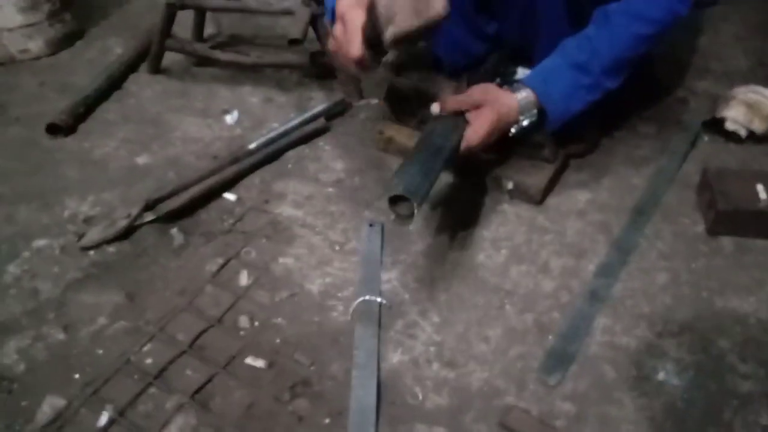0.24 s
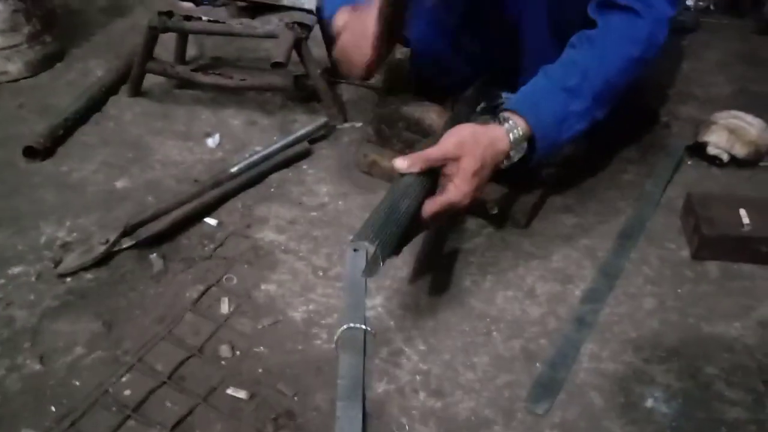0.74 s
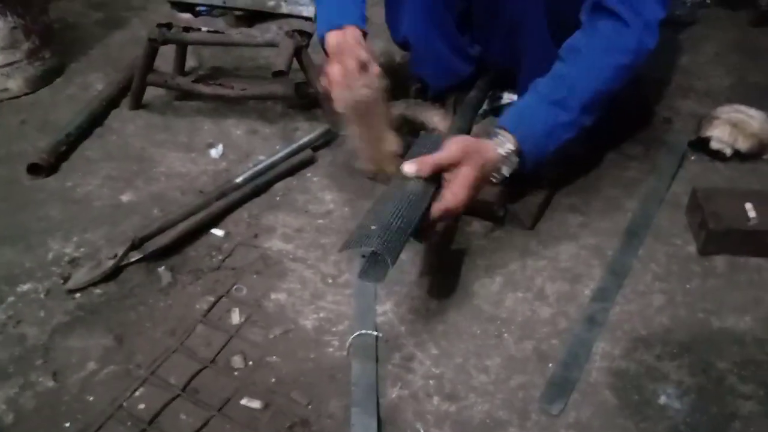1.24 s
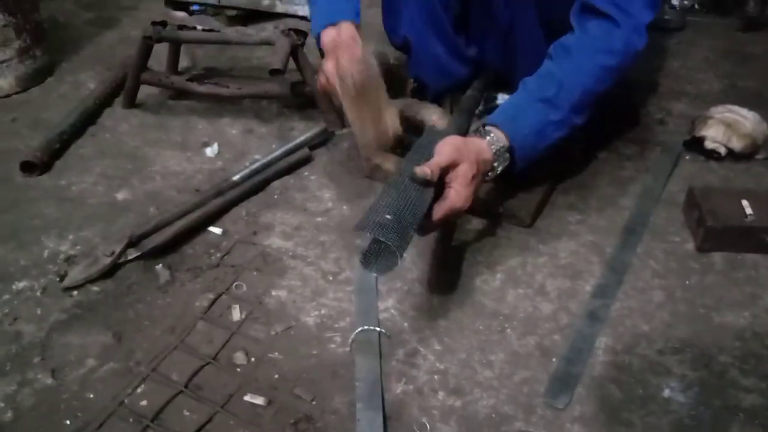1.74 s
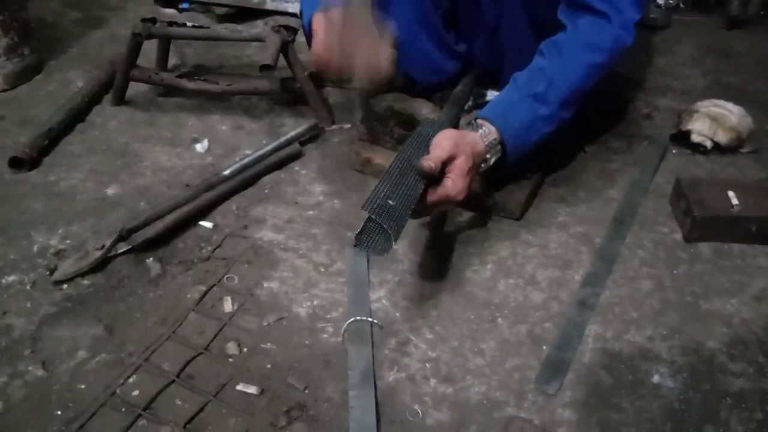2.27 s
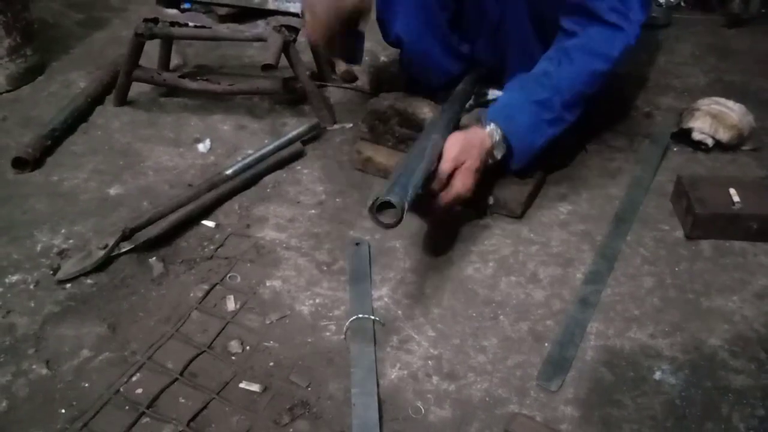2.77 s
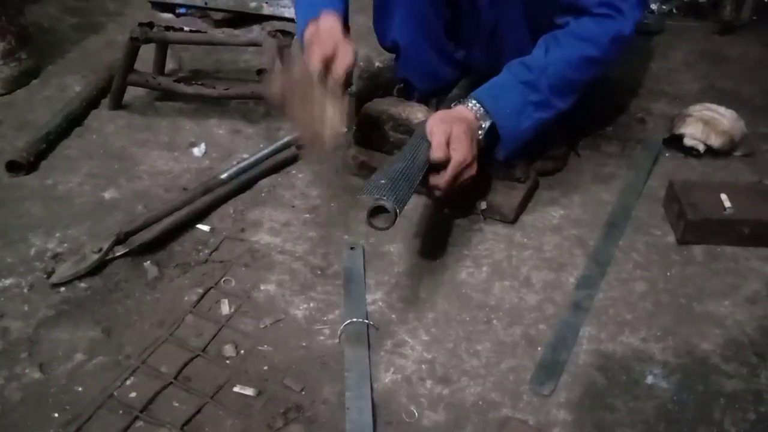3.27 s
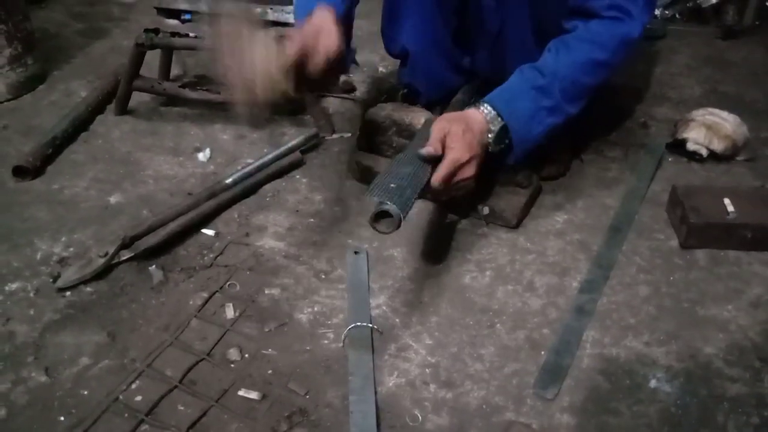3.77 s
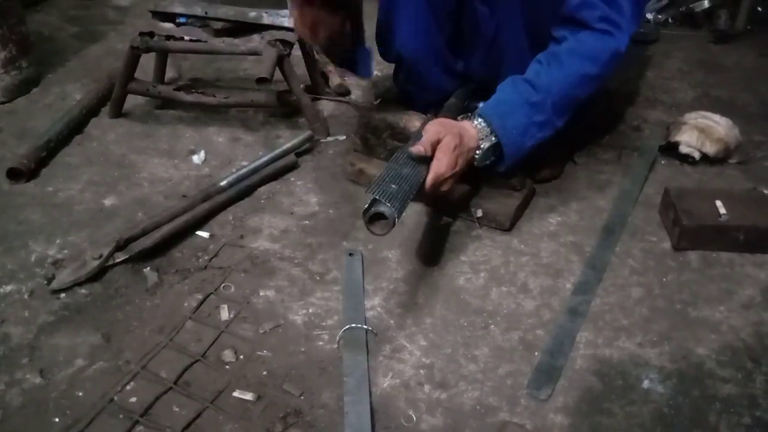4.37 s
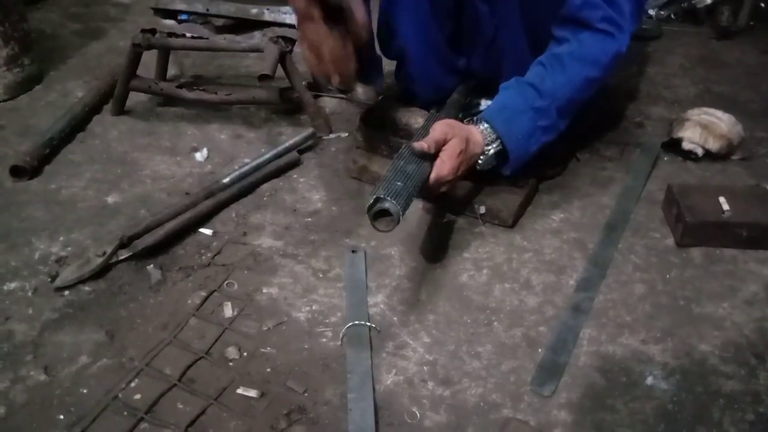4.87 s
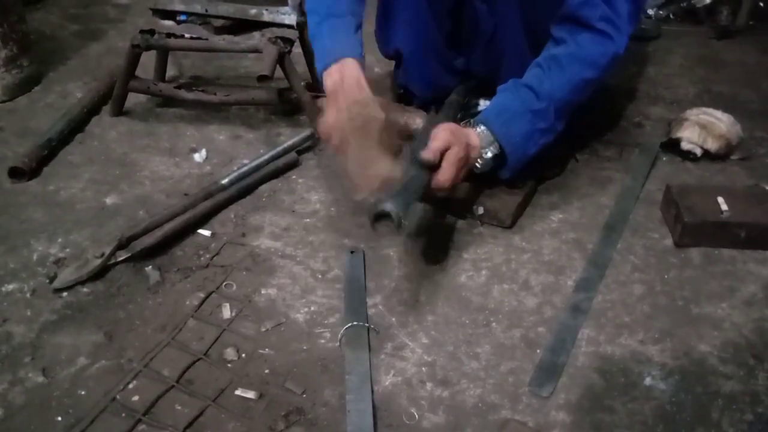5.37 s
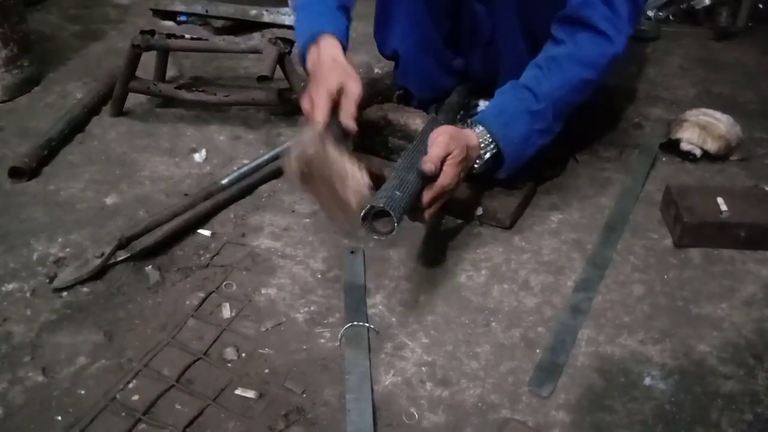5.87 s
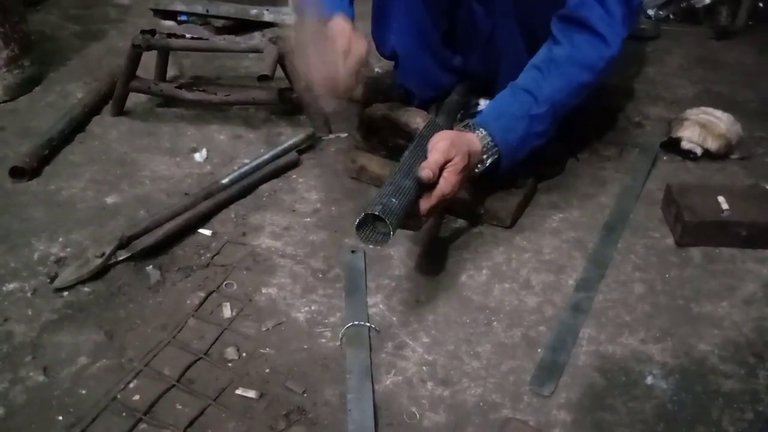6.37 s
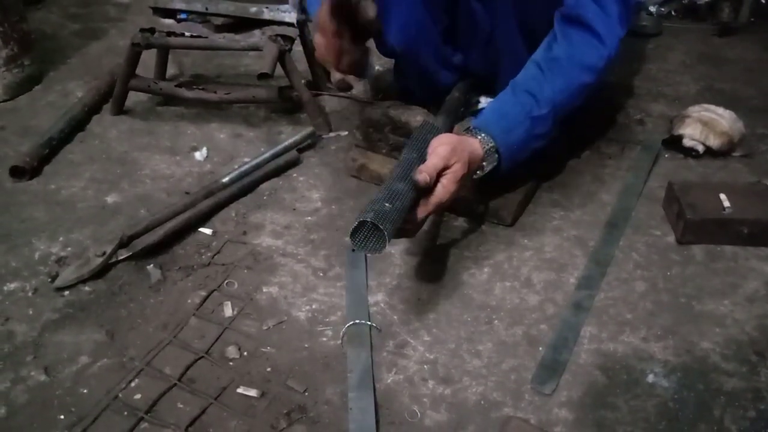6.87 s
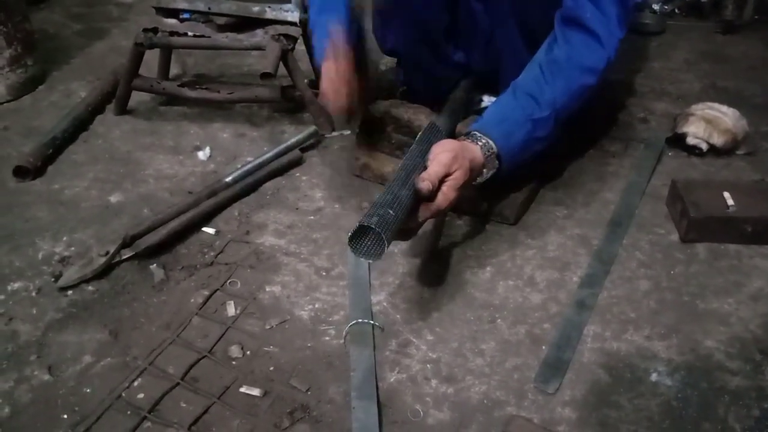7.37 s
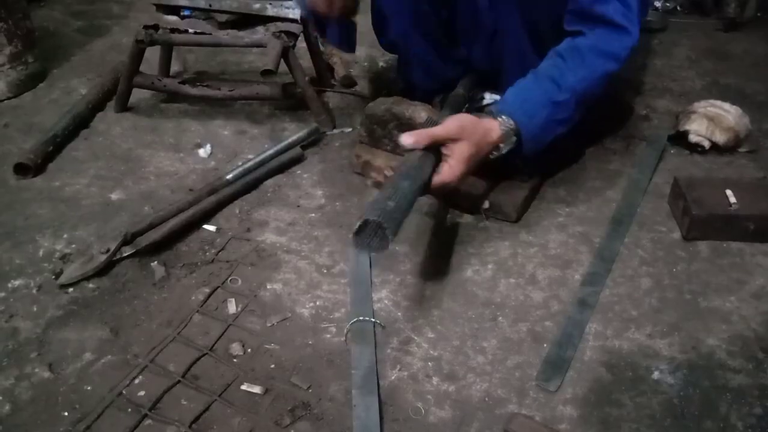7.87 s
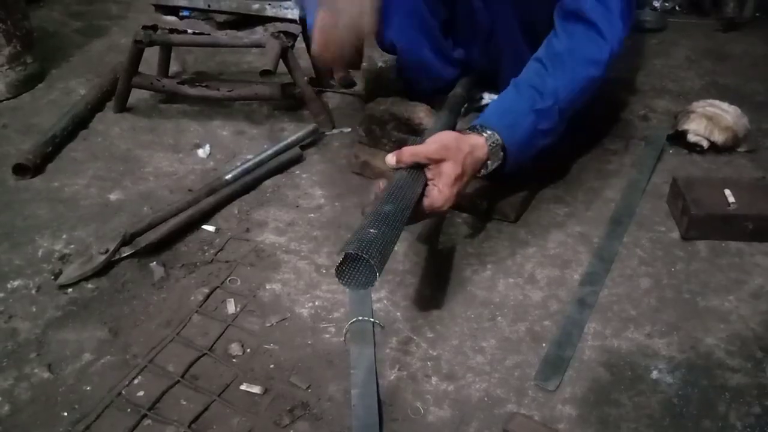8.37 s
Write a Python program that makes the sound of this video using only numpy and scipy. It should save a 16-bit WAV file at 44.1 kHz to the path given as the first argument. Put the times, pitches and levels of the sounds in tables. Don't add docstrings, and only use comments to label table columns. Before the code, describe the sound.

Regular mallet blows on a thin steel tube, crack, thud and brief damped ring, with distant tool clanks and machine drone in a shed.

```python
import sys
import numpy as np
from scipy import signal
from scipy.fft import rfft, irfft
from scipy.io import wavfile
from scipy.ndimage import uniform_filter1d

SR = 44100
rng = np.random.default_rng(int(sys.argv[2]) if len(sys.argv) > 2 else 0)


def volts_from_decibels(level):
    exponent = np.asarray(level, float) / 20
    return 10 ** exponent


def to_wav(sig):
    pcm = np.clip(np.atleast_2d(sig), -1, 1) * 32767
    pcm = np.round(pcm).astype(np.int16)
    wavfile.write(sys.argv[1], SR, pcm.T)


N = 380583


def unit(x):
    return x / np.sqrt(np.mean(x ** 2) + 1e-20)


def at_hz(points, hz):
    table_hz, value = np.transpose(points)
    return np.interp(np.log(hz), np.log(table_hz), value)


def coloured(x, spectrum):
    hz = np.maximum(np.fft.rfftfreq(N, 1 / SR), 1)
    return unit(irfft(rfft(x) * volts_from_decibels(at_hz(spectrum, hz)), N))


def drift(rate_hz):
    r = np.exp(-80 * np.pi * rate_hz / SR)
    slow = signal.lfilter([1], [1, -2 * r, r * r], rng.standard_normal(N // 40 + 2002))
    slow = slow[2000:]
    return np.interp(np.arange(N) / 40, np.arange(len(slow)), unit(slow))


def ring(clicks, hz, t60_s):
    r = volts_from_decibels(-60 / (t60_s * SR))
    w = 2 * np.pi * hz / SR
    return signal.lfilter([0, np.sin(w)], [1, -2 * r * np.cos(w), r * r], clicks + 1e-18)


def clicks_at(times_s, sizes):
    out = np.zeros(N)
    out[np.round(np.asarray(times_s) * SR).astype(int)] = sizes
    return out


# f/Hz, share
PORT_LIKENESS = [(60, 0.97), (250, 0.93), (700, 0.44), (1500, 0.25), (4000, 0.0069), (12000, 0.0063)]


def likeness(hz):
    return np.clip(at_hz(PORT_LIKENESS, hz), 0, 1)


def port_pair(mid, side, alike):
    return np.sqrt(1 + alike) * mid + np.sqrt(1 - alike) * side * [[1], [-1]]


# f/Hz, level/dB
PORT_LEAN = [(60, -2.5), (150, -2), (380, -2), (950, 0.5), (2380, -1), (5980, -2.5), (15000, -3.5)]
EDGES_HZ = np.geomspace(35, 16800, 28)


def bands(length):
    white = rng.standard_normal((2, 2, length))
    for k, (low, high) in enumerate(zip(EDGES_HZ, EDGES_HZ[1:])):
        band = signal.butter(2, [low, high], "band", fs=SR, output="sos")
        mid, side = signal.sosfilt(band, white[k % 2])
        hz = np.sqrt(low * high)
        lean_db = at_hz(PORT_LEAN, hz) / 2
        yield hz, port_pair(mid, side, likeness(hz)) * volts_from_decibels([[lean_db], [-lean_db]])


def struck(times_s, strength_db, modes, spread_db):
    port_lag_s, port_spread_db = .00006, 2.0
    luck = rng.standard_normal((len(times_s), len(modes), 3))
    sign = rng.choice([-1, 1], luck.shape[:2])
    out = np.zeros((2, N))
    for k, (hz, db, t60_s) in enumerate(modes):
        size_db = strength_db + db + spread_db * luck[:, k, 0]
        uneven = 1 - likeness(hz)
        for side, way in enumerate((1, -1)):
            at_s = np.maximum(times_s + way * uneven * port_lag_s * luck[:, k, 1], 0)
            port_db = size_db + way * uneven * port_spread_db * luck[:, k, 2]
            out[side] += ring(clicks_at(at_s, sign[:, k] * volts_from_decibels(port_db)), hz, t60_s)
    return out


def burst(times_s, level_db, spectrum, t60_s, rise_s, grain_db):
    shape = np.zeros(N)
    for s, db in zip(times_s, level_db):
        start = round(s * SR)
        t = np.arange(min(N - start, SR // 2)) / SR
        shape[start:start + len(t)] += volts_from_decibels(db - 60 * t / t60_s) * (1 - np.exp(-t / rise_s))
    alike = likeness(np.maximum(np.fft.rfftfreq(N, 1 / SR), 1))
    mid, side = rfft(rng.standard_normal((2, N)))
    pair = irfft(port_pair(mid, side, alike), N)
    return shape * coloured(pair, spectrum) * unit(volts_from_decibels(grain_db * drift(147)))


# t/s, level/dB
ACTIVITY = [(0.0, -33.5), (0.55, -37.5), (0.69, -35), (0.96, -39), (1.18, -41.5), (2.06, -41), (3.03, -39),
            (3.15, -40), (3.53, -45), (3.92, -44.5), (4.2, -42.5), (4.47, -43.5), (4.62, -43), (5.26, -40),
            (6.3, -42), (7.07, -42.5), (8.41, -46.5), (8.63, -52.5)]
# t/s, level/dB
ENGINE_LEVEL = [(0.0, -57), (1.95, -62.5), (3.05, -54.5), (3.22, -60), (3.75, -62.5), (7.24, -60),
                (7.79, -65), (8.63, -69)]
# f/Hz, level/dB per Hz
AIR_SPECTRUM = [(18, -47), (30, -26), (86, -3), (190, -11.5), (371, -3.5), (498, -7.5), (682, -1.5),
                (1080, -6.5), (1510, -7.5), (1990, 1), (2660, -3.5), (3500, -9), (4500, -11), (5850, -47),
                (9900, -120)]
# f/Hz, level/dB per Hz
HISS_SPECTRUM = [(2120, -69), (3600, -5), (4420, -6), (5010, -0.5), (5370, 1.5), (7060, -14), (7660, -19),
                 (9010, -14.5), (9530, -25.5), (9770, -24), (11200, -18), (12400, -19), (13400, -16.5),
                 (15000, -9), (16000, -7.5)]


def roar():
    drone_hz = 85.3
    body_db, body_follows = -39, .8
    hiss_db, hiss_follows = -41, 0.94
    t = np.arange(N) / SR
    activity_db = np.interp(t, *np.transpose(ACTIVITY))
    rumble_db = np.interp(t, *np.transpose(ENGINE_LEVEL)) + 5.5
    swing_db = activity_db - activity_db.mean()
    parts = [0, 0, 0]
    together = drift(2.6)
    for hz, noise in bands(N):
        part = int(hz > 200) + int(hz > 3800)
        parts[part] = parts[part] + noise * volts_from_decibels(1.46 * together + 2.0 * drift(11.8))
    drone = unit(ring(rng.standard_normal(N), drone_hz, 1.0))
    rumble = coloured(parts[0], AIR_SPECTRUM) + .5 * drone
    body = coloured(parts[1], AIR_SPECTRUM)
    hiss = coloured(parts[2], HISS_SPECTRUM)
    out = volts_from_decibels(rumble_db) * rumble
    out += volts_from_decibels(body_db + body_follows * swing_db) * body
    return out + volts_from_decibels(hiss_db + hiss_follows * swing_db) * hiss


# t/s, force level/dB, thin wall level/dB, ring level/dB, spot/share of tube length
MALLET_BLOWS = [(0.228, 4.5, -19, -13, 0.34), (0.708, -1.5, -10, -5, 0.45), (1.067, 5, -16.5, -20.5, 0.021),
                (1.568, 0, -15, -8.5, 0.15), (2.006, 3.5, -11.5, -20.5, 0.058),
                (2.469, -1.5, -12, -8, .334), (3.031, 0.5, -19, -11, 0.047), (3.524, -3, -16, -3, 0.24),
                (3.996, 4.5, -27.5, -17, .03), (4.444, 2.5, -33, -15, 0.028), (4.865, -0.5, -25, -4, 0.36),
                (5.284, 4.5, -21, -18.5, 0.045), (5.703, 2, -23.5, -10.5, 0.41),
                (6.119, 2.5, -20.5, -12.5, 0.25), (6.527, 2, -22, -11, 0.34),
                (6.929, -1, -12.5, -6.5, .035), (7.321, -8, -11.5, -1.5, 0.038), (8.086, -3.5, -9, -6, .2),
                (8.517, -0.5, -12, -8, .315)]


def ducking():
    ring_db = np.transpose(MALLET_BLOWS)[3]
    return np.maximum(11 + 0.53 * ring_db, 0)


def blows():
    s, peak_db, wall_db, ring_db, spot = np.transpose(MALLET_BLOWS)
    thud_db = -38 - 0.32 * wall_db
    return s + .0025, peak_db + ducking(), wall_db, ring_db, thud_db, spot


# t/s, seam knock level/dB, left minus right level/dB
TUBE_TURN = [
    (0.2, -24, 0),
    (1.07, -16, 6),
    (2.0, -15.5, -8),
    (3.5, -29.5, -1),
    (4.45, -17, -17.5),
    (5.3, -22, 15),
    (6.4, -33, -14),
    (7.0, -21.5, 3.5),
    (8.5, -20.5, -2),
]


def turned(t):
    turn_s, knock_db, lean_db = np.transpose(TUBE_TURN)
    return np.interp(t, turn_s, knock_db), np.interp(t, turn_s, lean_db)


def grip(times_s):
    swell_s, swell_share = .005, .5
    free_s, grip_db_per_s = 0.038, 104
    t = np.arange(N) / SR
    since_s = t - times_s[np.searchsorted(times_s, t, side="right") - 1]
    swell = 1 - swell_share * np.exp(-since_s / swell_s)
    return swell * volts_from_decibels(-grip_db_per_s * np.maximum(since_s - free_s, 0))


# f/Hz, level/dB, t60/s
LOWEST_MODES = [(2140, -12, .1), (2191, -3.5, .28), (2222, -11, .15), (2290, -12, .08)]
# f/Hz, level/dB, t60/s
SECOND_MODES = [(3010, -4, 0.15), (2975, -5, 0.1), (3075, 0, 0.08)]
# f/Hz, level/dB, t60/s
THIRD_MODES = [(3850, -5, .11), (3880, -3, .17), (3925, -5, .1)]
# f/Hz, level/dB, t60/s
HIGHER_MODES = [(4947, -9, 0.14), (4890, 1.5, 0.099), (5030, 10, 0.022), (5800, 9, 0.043), (5960, 0, 0.043),
                (6900, -11, .1)]
# f/Hz, level/dB, t60/s
TOPMOST_MODES = [(10510, -21, .14), (10860, -21, .14), (11140, -23, .12), (11520, -21, .14),
                 (13550, -21, .12)]


def tube_ring():
    earlier_db = -29
    s, force_db, _, ring_db, _, spot = blows()
    duck_db = ducking()
    with_earlier_s = np.r_[0, s]

    def order_db(order):
        return duck_db + 20 * np.log10(np.abs(np.sin(order * np.pi * spot)) + 1e-3)

    low = struck(with_earlier_s, np.r_[earlier_db, force_db + ring_db - 3], LOWEST_MODES, spread_db=0.65)
    low += struck(s, duck_db - 33, HIGHER_MODES, spread_db=4.5)
    low += struck(s, force_db - 25, TOPMOST_MODES, spread_db=2.5)
    upper = struck(with_earlier_s, np.r_[earlier_db - 8, order_db(2) - 22], SECOND_MODES, spread_db=4.5)
    upper += struck(with_earlier_s, np.r_[earlier_db - 10, order_db(3) - 27], THIRD_MODES, spread_db=2.0)
    flutter_db = 2.4 * drift(70)
    tube = (low + upper * volts_from_decibels(1.2 * flutter_db)) * volts_from_decibels(flutter_db)
    lean_db = turned(np.arange(N) / SR)[1] / 2
    return tube * volts_from_decibels([lean_db, -lean_db]) * grip(with_earlier_s)


# f/Hz, level/dB, t60/s
WALL_MODES = [(1270, -25.5, 0.09), (1642, -19, 0.1), (1633, 6, 0.029), (1908, -1.5, 0.042)]
# f/Hz, level/dB, t60/s
KNOCK_MODES = [(619, 0, 0.045), (687, -8, 0.084), (731, 3.5, 0.018), (902, 10.5, 0.028)]
# f/Hz, level/dB, t60/s
BLOCK_MODES = [(89.5, -8, 0.24), (180, 0.5, 0.13), (223.6, 8, 0.049), (294.5, 0.5, 0.14),
               (370, -2.5, 0.081)]


def wall_and_block():
    s, force_db, wall_db, _, thud_db, _ = blows()
    knock_db = turned(s)[0]
    out = struck(s, force_db + wall_db, WALL_MODES, spread_db=1.5)
    out += struck(s, force_db + knock_db - 4, KNOCK_MODES, spread_db=1.5)
    return out + struck(s + 0.0015, force_db + thud_db - 2, BLOCK_MODES, spread_db=1.4)


# f/Hz, level/dB per Hz
CRACK_SPECTRUM = [(59, -43), (100, -30), (854, 0), (1360, 6), (2270, 4.5), (3120, -5.5), (3470, -8),
                  (4870, -4.5), (7400, -26), (13800, -29), (16000, -29)]
# f/Hz, level/dB per Hz
SPRAY_SPECTRUM = [(6000, -40), (9800, -25), (10600, -8), (12000, -16), (13600, 10), (16000, 10)]
# f/Hz, level/dB per Hz
SHUDDER_SPECTRUM = [(50, -8), (100, 3), (230, -7), (400, -3.5), (700, 2.5), (1200, -42)]
# f/Hz, level/dB per Hz
RATTLE_SPECTRUM = [(290, -65), (500, -40), (668, -4), (1110, -11.5), (1530, -7), (2010, -4.5), (2190, -2),
                   (2360, -7), (3060, -9.5), (3490, -24.5), (4870, -17.5), (9490, -40), (9920, -64),
                   (10500, -27.5), (16000, -49)]


def crack_and_debris():
    s, force_db, _, _, thud_db, _ = blows()
    out = burst(s - .001, force_db - 6.0, CRACK_SPECTRUM, 0.024, rise_s=0.0018, grain_db=3.0)
    out += burst(s, force_db - 33.5, SPRAY_SPECTRUM, 0.19, rise_s=0.0024, grain_db=7.0)
    out += burst(s + 0.0024, force_db + thud_db, SHUDDER_SPECTRUM, 0.18, rise_s=0.0085, grain_db=3.0)
    return out + burst(s + 0.0082, force_db - 22.0, RATTLE_SPECTRUM, 0.21, rise_s=0.0054, grain_db=1.0)


# t/s, peak level/dB, low mode f/Hz, middle mode f/Hz, ring level/dB (near 0 clank, far below rustle)
FAR_CLANKS = [(0.6025, -19.5, 2290, 3630, -4), (0.986, -21.5, 1960, 3715, -6),
              (1.8997, -20.5, 2020, 3270, -4.5), (2.25, -26, 2430, 3600, -5), (2.826, -22.5, 2000, 5900, 0),
              (2.8376, -17, 1900, 3466, -3), (3.716, -24.5, 2270, 3605, 2.5),
              (3.866, -13, 2610, 3800, -0.5), (3.878, -41, 2850, 3850, -1), (4.236, -28, 2080, 4230, 2),
              (4.408, -20.5, 2720, 4220, -9), (4.829, -19, 2250, 3773, -1), (5.097, -38, 2620, 4143, -9),
              (5.1515, -19.5, 2880, 3710, -4), (5.9756, -19.5, 2370, 3604, -4.5),
              (6.3135, -24, 2080, 3340, -5), (7.0966, -29, 2040, 3450, -9),
              (7.1815, -23.5, 2250, 3570, 2.5), (7.2092, -19.5, 2290, 3720, -5.5),
              (7.5125, -23.5, 2100, 4900, -10), (8.451, -40, 2000, 3250, 6)]
# f/Hz, level/dB per Hz
CLATTER_SPECTRUM = [(88, -45), (150, -61), (790, -5), (1240, -11.5), (2760, 3), (4160, -8.5), (5150, 2.5),
                    (7920, -20), (14000, -18.5), (16000, -31)]


def far_clanks():
    t60_s, mode_t60_s, high_hz = 0.082, .025, 5144
    s, peak_db, low_hz, mid_hz, ring_db = np.transpose(FAR_CLANKS)
    out = burst(s, peak_db - 4.0, CLATTER_SPECTRUM, t60_s, rise_s=0.0037, grain_db=2.0)
    flat = [(500, 0), (9000, 0)]
    shower = burst(s, peak_db + ring_db - 23, flat, t60_s, rise_s=.0015, grain_db=6.5)
    ends_s = np.r_[s[1:], N / SR]
    for k, (start, end) in enumerate(zip(s, ends_s)):
        part = slice(round(start * SR), round(end * SR))
        for hz, db in ((low_hz[k], -.1), (mid_hz[k], -1.5), (high_hz, -2.5)):
            out[:, part] += volts_from_decibels(db) * ring(shower[:, part], hz, mode_t60_s)
    return out


# t/s, peak level/dB, f/Hz, t60/s
HOLLOW_BUMPS = [
    (0.989, -25, 248, 0.55),
    (1.407, -33, 100, 0.14),
    (1.907, -28, 300, 0.33),
    (2.359, -33, 97, 0.17),
    (2.847, -22.5, 285, 0.076),
    (5.198, -21, 267, 0.2),
    (6.325, -25.5, 301, 0.35),
    (6.827, -36, 105, 0.17),
]


def far_bumps():
    out = np.zeros(N)
    push = np.hanning(40) / 20
    for s, db, hz, t60_s in HOLLOW_BUMPS:
        out += ring(signal.lfilter(push, 1, clicks_at([s], volts_from_decibels(db - 7.5))), hz, t60_s)
    return out


# f/Hz, t60/s
SHED_T60 = [(80, 0.27), (300, 0.35), (1000, 0.2), (3000, 0.27), (8000, 0.43), (16000, 0.13)]


def shed(x):
    t = np.arange(SR // 2) / SR
    tail = sum(noise * volts_from_decibels(-60 * t / at_hz(SHED_T60, hz)) for hz, noise in bands(len(t)))
    tail = tail * (1 - np.exp(-t / 0.0043))
    tail = tail / np.sqrt(np.mean(np.sum(tail ** 2, axis=1)))
    return signal.fftconvolve(x[None], tail, axes=1)[:, :N]


def scene():
    air = roar()
    tube = tube_ring()
    blow = (wall_and_block() + crack_and_debris()) * volts_from_decibels([[-.6], [.6]])
    far = far_clanks() + far_bumps()
    sent = volts_from_decibels(-11) * tube.mean(0) + volts_from_decibels(-8.5) * blow.mean(0) + volts_from_decibels(-4.0) * far[0]
    return air + tube + blow + volts_from_decibels(-1.5) * far + shed(sent)


def roll_off(x):
    return signal.sosfilt(signal.butter(12, 16480, fs=SR, output="sos"), x)


def record(dry):
    ahead_s, hold_s, recover_s = .023, 0.012, .06
    duck = clicks_at(np.transpose(MALLET_BLOWS)[0] - ahead_s, ducking())
    hold = np.ones(round(hold_s * SR))
    held_db = signal.fftconvolve(duck, hold)[:N]
    after = np.r_[np.zeros(len(hold)), duck][:N]
    back = np.exp(-1 / (recover_s * SR))
    duck_db = held_db + signal.lfilter([1], [1, -back], after + 1e-18)
    duck_db = uniform_filter1d(duck_db, size=260)
    bass_cut = signal.butter(3, 62, "high", fs=SR, output="sos")
    top_cut = signal.cheby2(10, 40, 15900, fs=SR, output="sos")
    mic = signal.sosfilt(bass_cut, dry * volts_from_decibels(-duck_db))
    mic = signal.sosfilt(top_cut, np.tanh(mic))
    return roll_off(mic)


dry = scene()
out = record(dry)
to_wav(out)
```